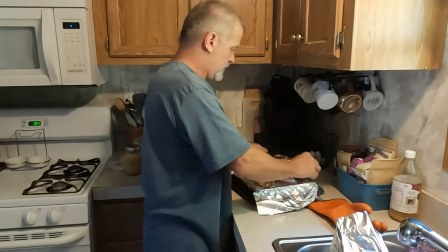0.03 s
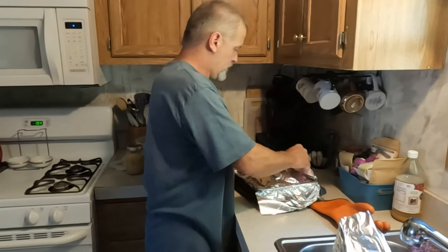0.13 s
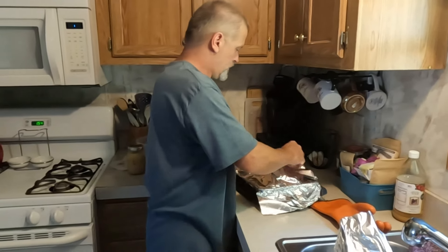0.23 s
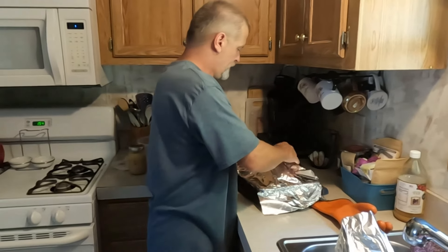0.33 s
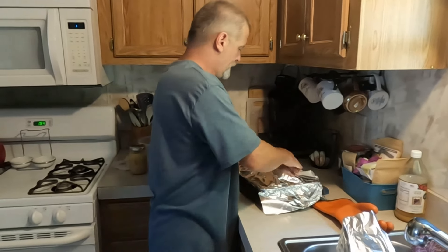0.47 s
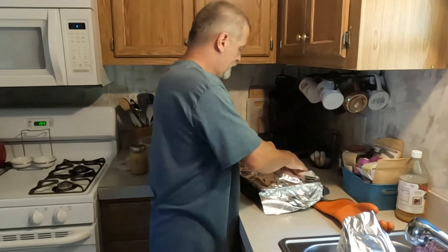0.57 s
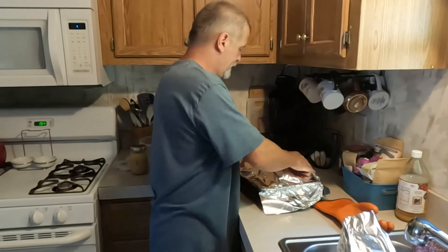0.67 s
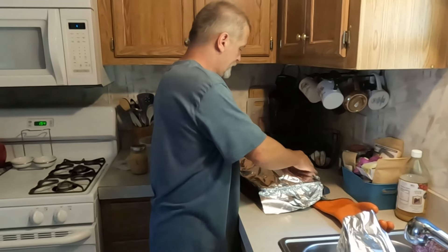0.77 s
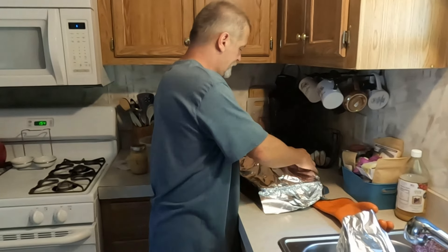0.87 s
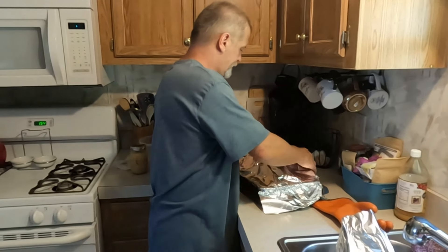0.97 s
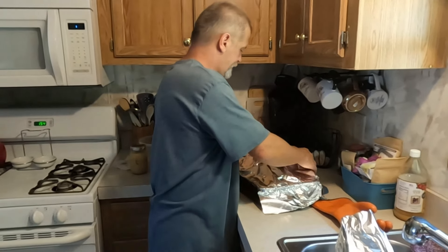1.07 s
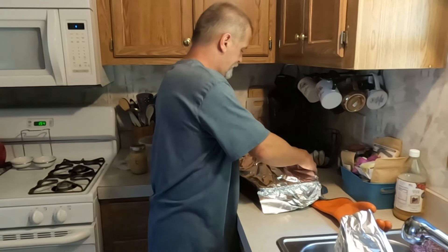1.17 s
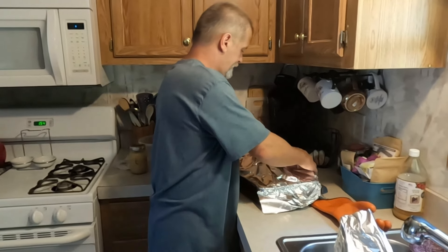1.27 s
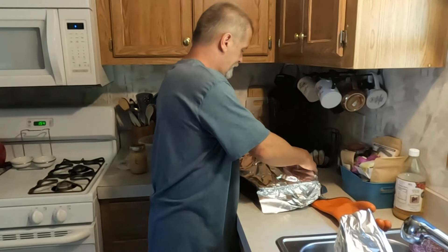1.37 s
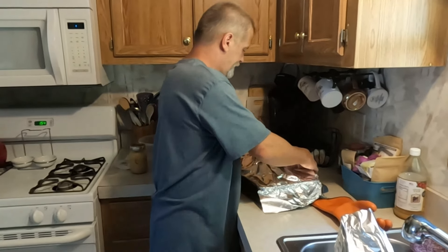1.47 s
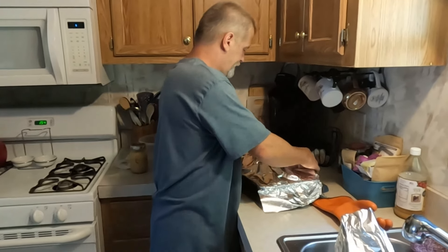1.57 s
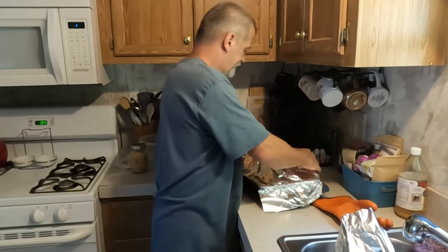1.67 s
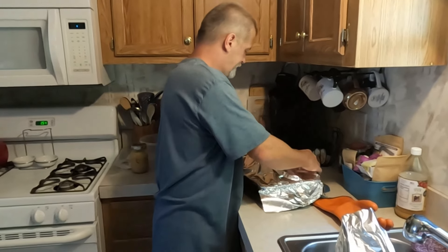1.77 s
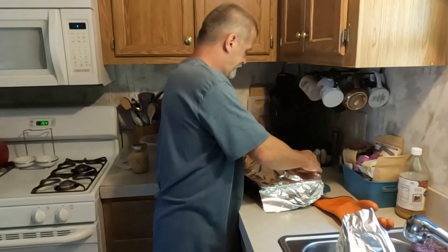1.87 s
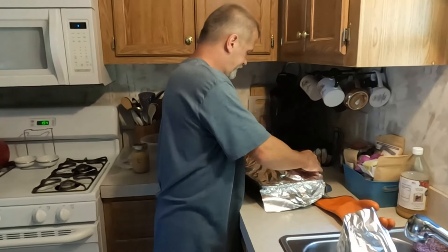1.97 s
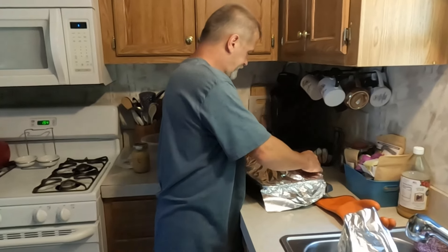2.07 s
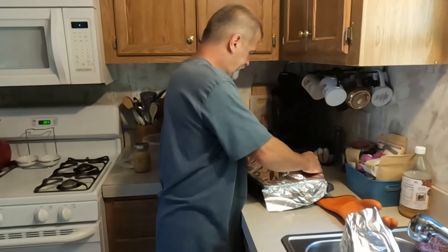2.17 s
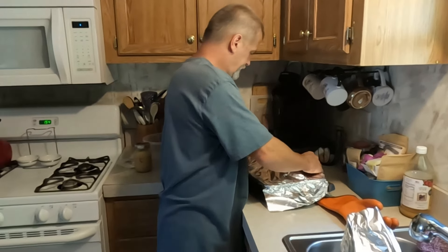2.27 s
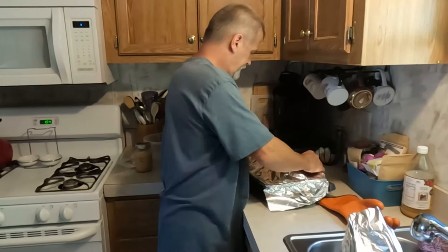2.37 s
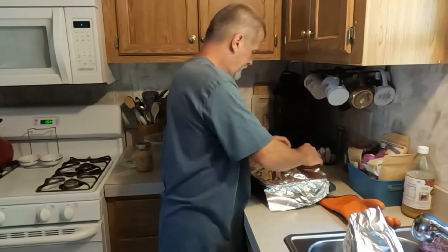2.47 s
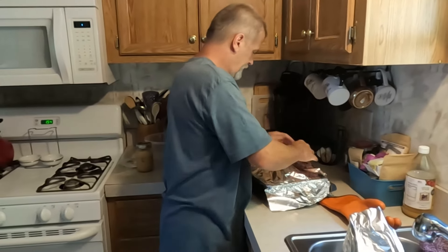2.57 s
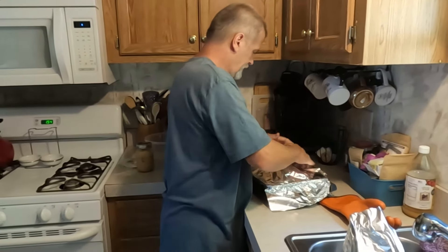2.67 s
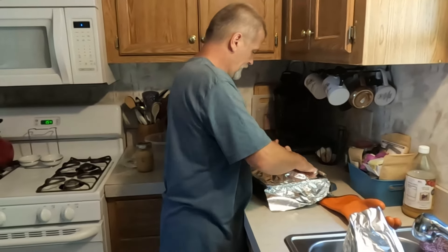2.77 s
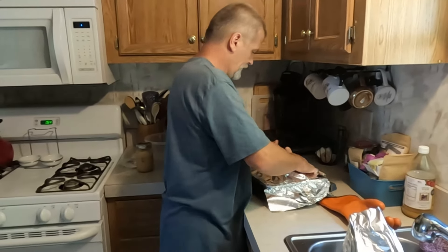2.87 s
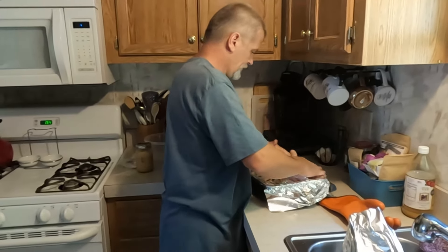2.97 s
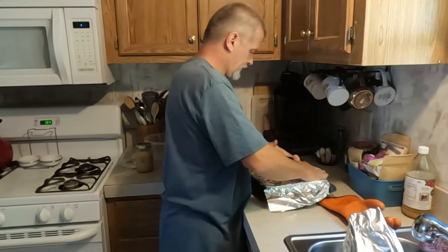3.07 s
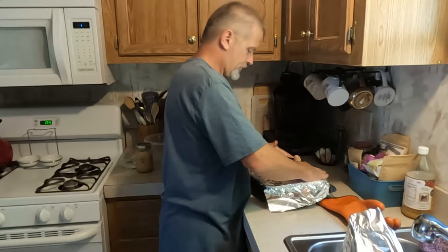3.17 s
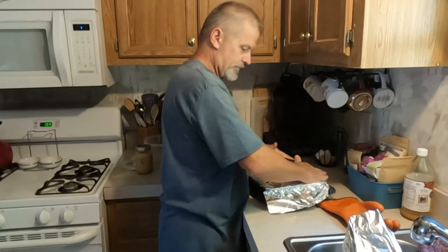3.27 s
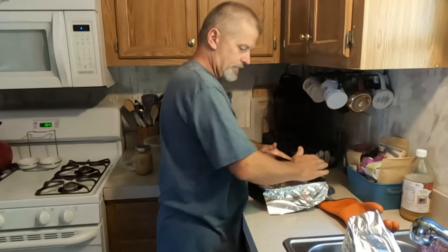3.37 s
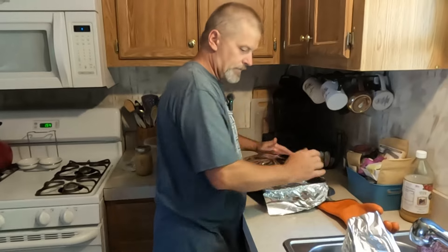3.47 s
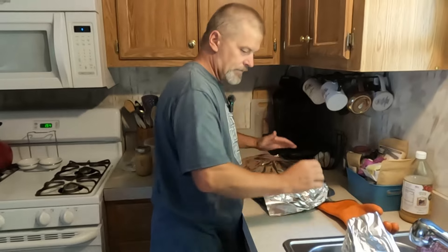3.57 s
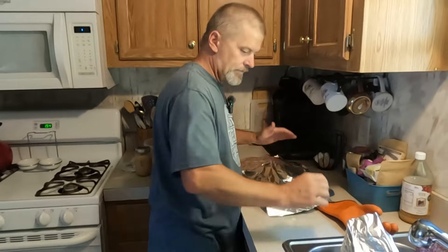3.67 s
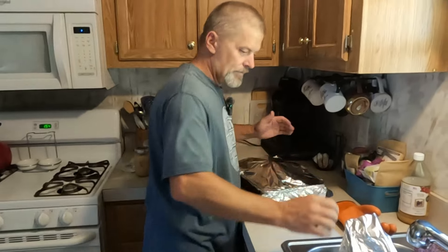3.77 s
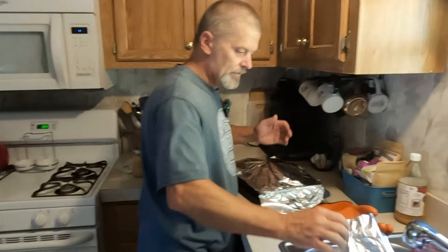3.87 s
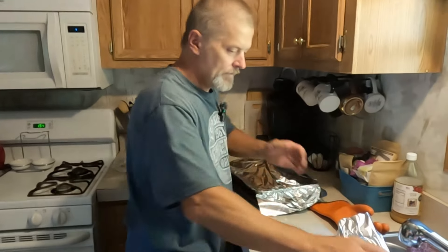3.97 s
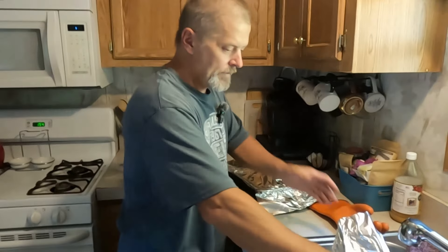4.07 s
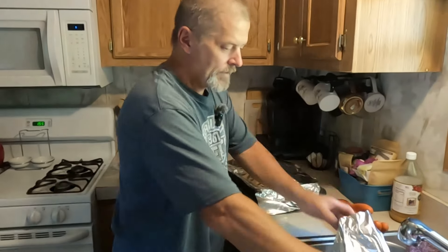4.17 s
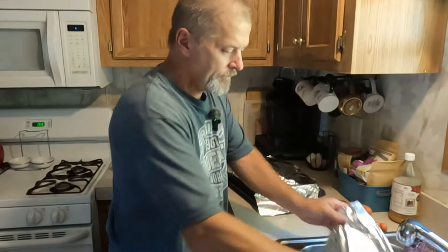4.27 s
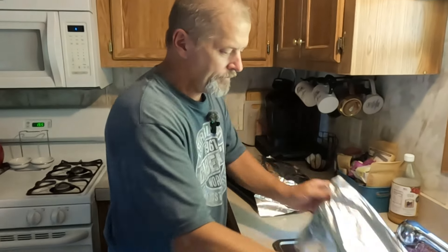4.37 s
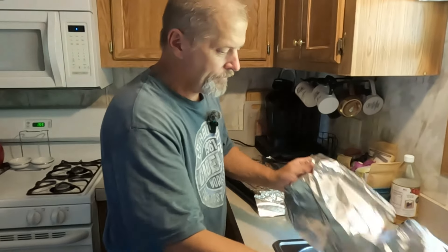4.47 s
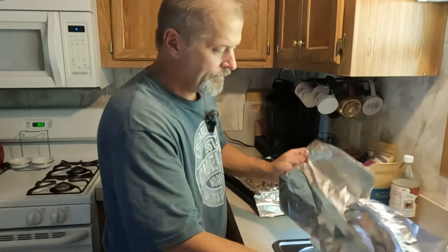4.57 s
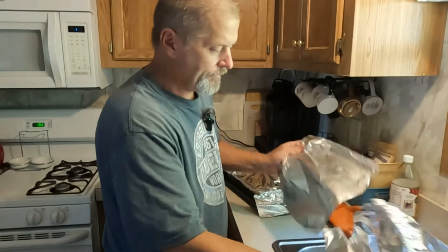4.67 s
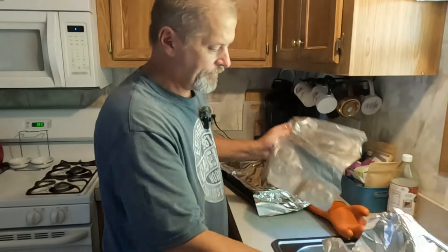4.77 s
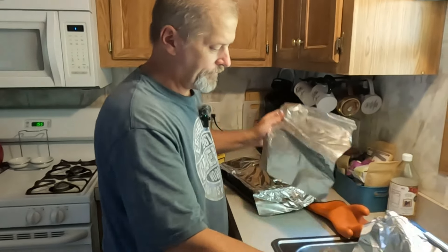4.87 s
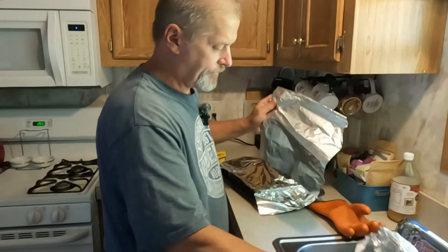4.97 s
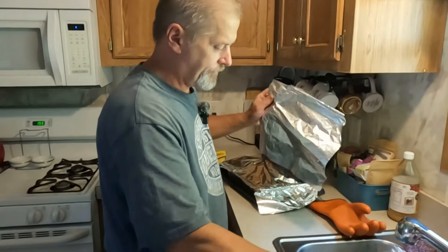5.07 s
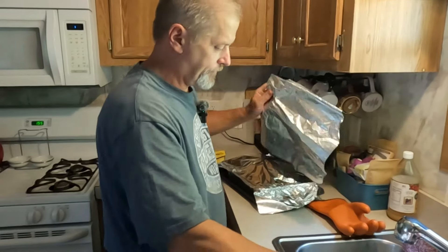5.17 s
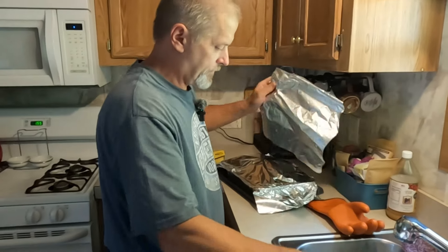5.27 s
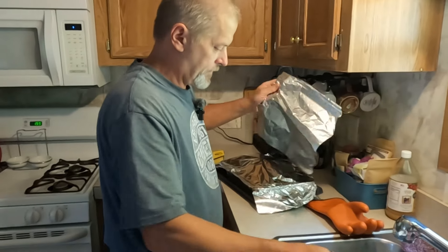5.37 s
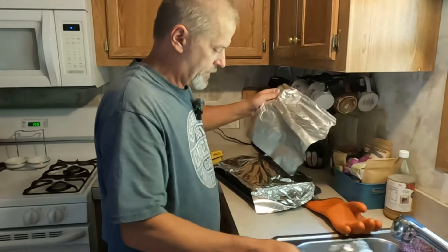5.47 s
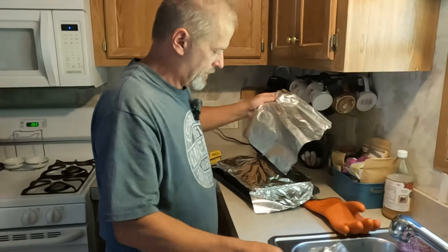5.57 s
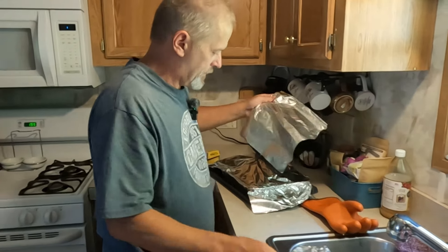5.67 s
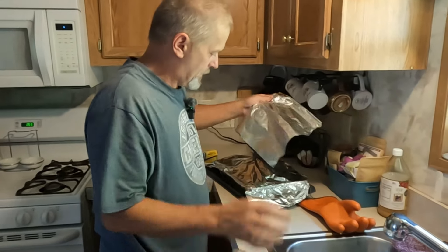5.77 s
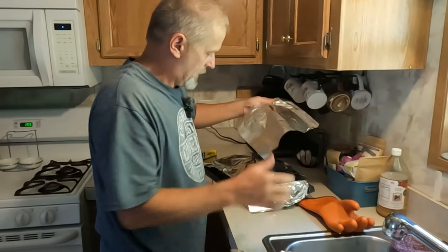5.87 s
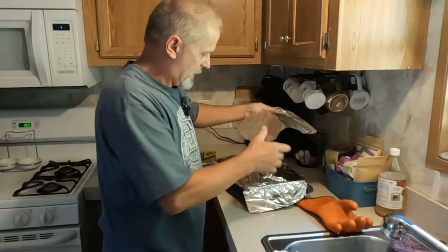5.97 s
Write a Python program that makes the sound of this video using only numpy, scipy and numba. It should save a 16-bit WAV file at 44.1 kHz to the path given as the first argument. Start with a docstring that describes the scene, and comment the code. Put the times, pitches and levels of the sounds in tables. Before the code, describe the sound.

Hands pinch and flatten crinkling foil over a pan in a quiet kitchen, pause, then lift another sheet with a loud rustle.

```python
"""Aluminium foil crackles as fingers crimp it round a pan, over a fridge hum in a small kitchen.
Creases buckle in swarms of tiny snaps, each ringing facets of the foil; folds give way, panels flip
and ring, sliding foil swishes and a fingertip squeaks. Palms press the foil flat and the pan rocks
on the counter. After a lull a second sheet is picked up, swung and held. The sound is mono."""
import sys
import numpy as np
from scipy import signal
from scipy.fft import rfft, irfft
from scipy.io import wavfile
from scipy.ndimage import uniform_filter1d
from numba import njit

SR = 44100
rng = np.random.default_rng(int(sys.argv[2]) if len(sys.argv) > 2 else 0)


def store_pcm(level_fs):
    """Save levels as 16-bit WAV."""
    pcm = np.round(np.clip(level_fs, -1, 1) * 32767).astype(np.int16)
    wavfile.write(sys.argv[1], SR, np.atleast_2d(pcm).T)


N = 264908
TIME = np.arange(N) / SR
TOP_HZ = 15800


def undb(db):
    """Decibels to gain."""
    return 10 ** (np.asarray(db) / 20)


def unit(x):
    """Scale to an rms of 1."""
    return x / np.sqrt(np.mean(x ** 2))


def fade(t, t60_s):
    """Exponential decay."""
    return np.exp(-np.log(1000) * t / t60_s)


def add(out, start_s, x):
    """Mix x into out."""
    i = max(int(start_s * SR), 0)
    out[i:i + len(x)] += x[:N - i]


def drift(rate_hz):
    """Smooth random drift, rms 1."""
    step = int(SR / rate_hz)
    stairs = np.repeat(rng.standard_normal(N // step + 1), step)
    return unit(uniform_filter1d(stairs, step)[:N])


def colour(x, points, peaks=(), size=2048):
    """Minimum-phase filter: (frequency [Hz], gain [dB]) points, a low cut and bell-shaped peaks."""
    f = np.maximum(np.arange(size // 2 + 1) * SR / size, 1)
    hz, db = np.transpose(points)
    curve_db = np.interp(np.log(f), np.log(hz), db) - 20 * np.log10(1 + (hz[0] / f / 2) ** 2)
    for centre_hz, width_hz, lift_db in peaks:
        curve_db += lift_db * np.exp(-2 * ((f - centre_hz) / width_hz) ** 2)
    cepstrum = irfft(np.log(undb(curve_db)))
    cepstrum[1:size // 2] *= 2
    cepstrum[size // 2 + 1:] = 0
    impulse = irfft(np.exp(rfft(cepstrum)))
    return signal.fftconvolve(x, impulse)[:len(x)]


def reflect(x, t60_s, wet_db, gap_s):
    """Direct sound plus a diffuse tail of reflections."""
    t = TIME[:int((t60_s + gap_s) * SR)]
    tail = rng.standard_normal(len(t)) * fade(t, t60_s) * (t > gap_s)
    return x + undb(wet_db) * signal.fftconvolve(x, tail / np.linalg.norm(tail))[:len(x)]


@njit
def facets(start_s, hz, t60_s, amplitude, length):
    """Each facet of the foil rings as a decaying sine."""
    out = np.zeros(length)
    for k in range(len(start_s)):
        pole = np.exp((2j * np.pi * hz[k] - np.log(1000) / t60_s[k]) / SR)
        phasor, first = amplitude[k] + 0j, int(start_s[k] * SR)
        for i in range(first, min(first + int(t60_s[k] * SR), length)):
            out[i] += phasor.imag
            phasor *= pole
    return out


def snaps(times_s, strengths, length, cycles=32, spread=0.86, facet_count=5):
    """Each buckling crease shakes a few facets of random size; large ones ring lower and longer."""
    hz = rng.uniform(98.6, TOP_HZ, len(times_s) * facet_count)
    t60_s = np.minimum(cycles / hz * np.exp(spread * rng.standard_normal(len(hz))), .04)
    amplitude = np.repeat(strengths, facet_count) * rng.choice([-1, 1], len(hz)) / np.sqrt(t60_s)
    return facets(np.repeat(times_s, facet_count), hz, t60_s, amplitude, length)


def swarm(snaps_per_s, scatter_db, bounce_db, places=14):
    """Snaps at many places on the foil, each place with its own bounces off pan, counter and cupboards."""
    out, each = np.zeros(N), int(snaps_per_s * N / SR / places)
    for _ in range(places):
        strengths = undb(scatter_db * np.minimum(rng.exponential(size=each), 3))
        direct = snaps(rng.uniform(0, N / SR, each), strengths, N)
        out += reflect(direct, t60_s=0.049, wet_db=bounce_db, gap_s=.001)
    return unit(out)


def shifting(x, depth_db, width_hz=450):
    """The foil keeps changing shape, so neighbouring bands swell and sink on their own."""
    f, _, frames = signal.stft(x, SR, nperseg=512)
    swell = uniform_filter1d(rng.standard_normal(frames.shape), size=9, axis=1)
    swell = uniform_filter1d(swell, max(int(width_hz / f[1]), 1), axis=0)
    return signal.istft(frames * undb(depth_db * unit(swell)), SR)[1][:len(x)]


# foil resonances and dips: (centre [Hz], width [Hz], gain [dB])
FOIL_RESONANCES = [(746, 290, -4), (1640, 240, 1.5), (2350, 600, -1), (3820, 410, 3), (5260, 280, 2),
                   (6470, 1000, 4.5), (7730, 570, -4.5), (8560, 810, 6.5), (9550, 650, -4),
                   (11260, 1500, -4), (13400, 1800, 5)]
# borders between broad flexing, stiff folds, ordinary crackle and fine creases: (frequency [Hz])
BAND_EDGES_HZ = (2350, 5100, 9650)


def crackle(levels_db, points, rings, snaps_per_s, scatter_db, rub_db, shift_db, bounce_db,
            flex_db, flex_growth, flex_reference_db=-35):
    """Snaps over sliding friction in four bands; the lowest, broad flexing, grows with the stiff folds."""
    flexing_db = flex_db + flex_growth * (levels_db[0] - flex_reference_db)
    source = swarm(snaps_per_s, scatter_db, bounce_db) + undb(rub_db) * rng.standard_normal(N)
    coloured = colour(shifting(source, shift_db), points, FOIL_RESONANCES + rings)
    spectrum = rfft(coloured, 2 ** 19)
    f = np.linspace(0, SR / 2, len(spectrum))
    lowpasses = [1 / (1 + (f / edge_hz) ** 20) for edge_hz in BAND_EDGES_HZ]
    masks = np.diff([np.zeros_like(f), *lowpasses, np.ones_like(f)], axis=0)
    bands = [unit(irfft(spectrum * mask)[:N]) for mask in masks]
    return sum(band * undb(db) for band, db in zip(bands, (flexing_db, *levels_db)))


def strokes(rows, fall_db_per_s, build_db=20):
    """Hand strokes build, hold and let go; gives stiff-fold, crackle and fine-crease levels in dB."""
    power = 1e-14
    for time_s, build_s, hold_s, db, stiff_db, fine_db in rows:
        rise_db = -build_db * np.maximum(time_s - TIME, 0) / build_s
        fall_db = -fall_db_per_s * np.maximum(TIME - time_s - hold_s, 0)
        envelope = undb(np.maximum(rise_db + fall_db, -120))
        power = power + np.outer(undb([db + stiff_db, db, db + fine_db]), envelope) ** 2
    return 10 * np.log10(power)


# pinches; the long weak row is the resting hand:
# (time [s], build [s], hold [s], level [dB], stiff folds [dB rel.], fine creases [dB rel.])
CRIMP_STROKES = [(0, 0.055, 2.3, -70, 5.5, -9), (.005, 0.053, 0.038, -43, -2.5, -9),
                 (.118, 0.032, 0.043, -26.5, -1.5, -8), (.19, 0.046, 0.038, -26, -1, -8),
                 (.385, 0.06, 0.053, -35.5, -3.5, -12), (.455, .018, .01, -29.5, -4, -5),
                 (.495, 0.068, 0.046, -35, 1, -6.5), (.645, 0.078, 0.036, -32, -2, -6),
                 (.722, 0.042, 0.028, -33, 1, -10), (.805, 0.046, .02, -46.5, 0, -9),
                 (.885, .08, 0.014, -46, 3.5, -14), (.93, .05, 0.097, -62, 3, -13),
                 (1.06, 0.1, 0.021, -37, 2.5, -10.5), (1.15, 0.039, 0.055, -48, 3.5, -2.5),
                 (1.335, 0.036, 0.0088, -50, 3.5, -8), (1.47, 0.022, 0.14, -56.5, 2.5, -10),
                 (1.672, 0.053, 0.044, -47.5, 3, -2), (1.72, 0.042, 0.054, -34.5, 1.5, -6.5),
                 (1.865, 0.086, 0.037, -48, 1, -5.5), (1.94, 0.053, 0.017, -30, -5.5, -7),
                 (1.98, 0.11, 0.0339, -26, 0.5, -7.5)]
# spectrum of pinched foil: (frequency [Hz], gain [dB])
CRIMP_SPECTRUM = [(150, -45.5), (250, -22.5), (570, -11.5), (850, -12), (1250, -10.5), (1720, -8),
                  (2100, -10.5), (2750, -10.5), (3500, -2), (5400, -3), (6800, -2), (8660, -3.5),
                  (10200, -6), (15900, -12)]
# rings of foil stretched over the pan: (centre [Hz], width [Hz], gain [dB])
STRETCHED_RINGS = [(560, 65, 4.5), (1210, 80, -1), (1420, 100, 3), (1550, 73, -1), (1720, 130, 1),
                   (2570, 85, 3.5), (2740, 200, -1.5)]


def crimp(body_hz=1740, body_width_hz=250, body_db=5.7):
    """Fingers pinch the foil round the rim; its hollow body resonates."""
    rings = STRETCHED_RINGS + [(body_hz, body_width_hz, body_db)]
    return crackle(strokes(CRIMP_STROKES, fall_db_per_s=419), CRIMP_SPECTRUM, rings,
                   snaps_per_s=1600, scatter_db=3.5, rub_db=-8.5, shift_db=2.0, bounce_db=-0.5,
                   flex_db=-43, flex_growth=0.61)


# fridge partials: (frequency [Hz], level [dB])
FRIDGE_PARTIALS = [(57.8, -64.5), (116.2, -55.5), (175, -63)]
# spectra of room rumble and air: (frequency [Hz], gain [dB])
RUMBLE_SPECTRUM = [(12, -48), (20, -4.5), (59, 2.5), (86, -5.5), (118, -3.5), (144, -9), (250, -17),
                   (320, -37), (550, -120)]
AIR_SPECTRUM = [(100, -13.5), (170, 0), (500, -1.5), (1000, -6), (2500, -13.5), (6000, -21.5),
                (15000, -27.5)]
# background dip: (time [s], gain [dB])
KITCHEN_GAIN = [(0, 0.5), (1.9, -0.5), (3.15, -0.5), (3.55, -3), (3.85, -7.5), (4.03, -15), (4.15, -9.5),
                (4.26, -12.5), (4.45, -3.5), (6.0, 0.5)]


def kitchen(hum_gain_db=.5, hum_wobble=0.00498, rumble_db=-51, air_db=-52):
    """Fridge hum, low rumble and soft air noise; all dip once while the hands are off the foil."""
    hum = np.zeros(N)
    for hz, db in FRIDGE_PARTIALS:
        level_db = db + hum_gain_db + 1.4 * drift(3.4)
        pitch_hz = hz * (1 + hum_wobble * drift(4.5))
        hum += undb(level_db) * unit(np.sin(2 * np.pi * np.cumsum(pitch_hz) / SR))
    rumble = unit(colour(rng.standard_normal(N), RUMBLE_SPECTRUM, size=8192))
    rumble *= undb(rumble_db + drift(4.7))
    air = unit(colour(rng.standard_normal(N), AIR_SPECTRUM)) * undb(air_db + 2.3 * drift(17))
    return (hum + rumble + air) * undb(np.interp(TIME, *np.transpose(KITCHEN_GAIN)))


# collapsing folds: (time [s], level [dB], focus [Hz])
FOLD_BURSTS = [(.0922, -24, 5200), (0.1021, -14.5, 8330), (.1154, -19, 3900), (.186, -9.5, 3600),
               (.4489, -12.5, 4510), (0.494, -17.5, 3820), (.7144, -24, 3770), (1.0524, -20.5, 3600),
               (1.4608, -37, 3870), (1.6643, -27, 3870), (1.711, -14, 4100), (1.994, -7, 4320),
               (2.0607, -14.5, 6470), (2.092, -9.5, 8900), (2.2292, -13, 6690), (2.2983, -21.5, 8720),
               (2.367, -22, 4160), (2.501, -33, 3800), (2.7251, -39, 3390), (2.9113, -21.5, 6600),
               (2.924, -26, 5470), (3.19, -21.5, 8810), (4.2922, -18, 6860), (4.3481, -22, 6840),
               (4.5645, -13, 6170), (4.6937, -12, 6700), (4.8021, -12, 8550), (5.903, -14.5, 3750)]


def folds(gain_db=-13, focus_db=6, focus_width_hz=1300, mean_delay_s=.01, followers=24, t60_s=0.074):
    """A fold gives way in an avalanche: one snap, then followers that thin out."""
    out = np.zeros(N)
    for time_s, db, hz in FOLD_BURSTS:
        delays_s = np.append(0, rng.exponential(mean_delay_s, followers))
        strengths = fade(delays_s, t60_s) * undb(0.81 * rng.standard_normal(followers + 1))
        burst = reflect(snaps(delays_s, strengths, SR // 5), t60_s, wet_db=0.5, gap_s=0.00075)
        burst = colour(burst, CRIMP_SPECTRUM, FOIL_RESONANCES + [(hz, focus_width_hz, focus_db)])
        onset_rms = np.std(burst[:SR // 100])
        add(out, time_s, burst / onset_rms * undb(db + gain_db))
    return out


# flat foil panels flipping over: (time [s], peak [dB], pitch [Hz], t60 [s])
PANEL_FLIPS = [(0.0922, -22, 5440, 0.015), (.141, -38, 1690, 0.051), (.452, -24, 3640, 0.057),
               (0.5, -24.5, 3460, 0.087), (1.053, -29.5, 1760, 0.083), (1.062, -38.5, 463, 0.2),
               (1.983, -9.5, 3550, .005), (2, -24, 1683, 0.082), (2.307, -31, 1463, 0.14),
               (2.315, -36.5, 766, 0.15), (2.934, -36, 1182, 0.15), (3.213, -32.5, 957, 0.11),
               (5.705, -40.5, 1600, 0.178), (5.823, -32, 1560, 0.095), (5.899, -23, 1552, 0.2)]


def panels(wobble=0.013, rise_s=0.00023):
    """A flipping panel rings with an unsteady pitch as its tension settles."""
    out, t = np.zeros(N), TIME[:SR // 5]
    waver = drift(250)
    for time_s, db, hz, t60_s in PANEL_FLIPS:
        pitch_hz = hz * (1 + wobble * np.roll(waver, -int(time_s * SR))[:len(t)])
        envelope = fade(t, t60_s) * (1 - np.exp(-t / rise_s))
        ring = np.sin(2 * np.pi * np.cumsum(pitch_hz) / SR) * envelope
        add(out, time_s, ring / np.abs(ring).max() * undb(db))
    return out


# swells of moving foil: (midpoint [s], length [s], centre [Hz], width [Hz], level [dB])
SWISH_SWELLS = [(.97, 0.28, 4270, 550, -45.5), (1.045, 0.11, 4150, 600, -37),
                (1.067, 0.116, 6230, 600, -36.5), (1.178, 0.11, 8500, 450, -42),
                (1.176, 0.092, 13500, 1200, -47), (1.886, 0.12, 2316, 150, -48.5),
                (2.133, 0.11, 1190, 200, -39), (2.142, 0.14, 2420, 450, -34.5), (4.378, .09, 645, 260, -27),
                (4.399, .22, 990, 130, -32.5), (4.752, .2, 790, 300, -26), (5.558, .25, 6370, 600, -47),
                (5.77, 0.11, 4060, 700, -44.5), (5.86, 0.16, 1380, 70, -40)]


def swishes(gain_db=-1):
    """Foil that slides under a finger or billows swells and fades in one narrow resonance."""
    out = np.zeros(N)
    for mid_s, length_s, hz, width_hz, db in SWISH_SWELLS:
        swell = np.hanning(int(length_s * SR))
        band = signal.butter(2, [hz - width_hz / 2, hz + width_hz / 2], "bandpass", fs=SR, output="sos")
        hiss = unit(signal.sosfilt(band, rng.standard_normal(len(swell))))
        add(out, mid_s - length_s / 2, hiss * swell * undb(db + gain_db))
    return out


def squeak(start_s=1.322, length_s=0.02, rise_s=0.0038, release_t60_s=0.09,
           pitch_hz=3210, wobble=0.012, level_db=-32.5, overtone_db=-27):
    """A fingertip sticks and slips on the foil for a moment."""
    t = TIME - start_s
    phase = 2 * np.pi * np.cumsum(pitch_hz * (1 + wobble * drift(410))) / SR
    tone = np.sin(phase) + undb(overtone_db) * np.sin(2 * phase)
    grip = np.clip(t / rise_s, 0, 1) * fade(np.maximum(t - length_s, 0), release_t60_s)
    return undb(level_db + 2 * drift(250)) * grip * tone


# palm strokes; the long weak row is the resting hand:
# (time [s], build [s], hold [s], level [dB], stiff folds [dB rel.], fine creases [dB rel.])
PRESS_STROKES = [(2.04, .05, 1.66, -69.5, 1.5, -9), (2.092, 0.078, 0.017, -24.5, -2, -6),
                 (2.125, .05, 0.042, -30, 0.5, -4), (2.19, 0.045, 0.057, -31, -0.5, -6),
                 (2.306, 0.025, 0.024, -32, 0, -6), (2.365, 0.037, 0.011, -42, 5, 0),
                 (2.516, 0.021, 0.044, -45.5, 5.5, -5), (2.6, 0.036, 0.011, -39.5, 0, -9),
                 (2.85, 0.042, 0.057, -60.5, 6, -4.5), (2.928, 0.028, 0.03, -31.5, 1, -14),
                 (2.98, .04, 0.0076, -47, 5.5, -8), (3.04, 0.039, 0.064, -55.5, 2.5, -6),
                 (3.196, 0.033, 0.042, -34.5, -2, -5.5), (3.28, .05, 0.062, -60.5, 4, -6),
                 (3.53, 0.029, 0.0105, -60, 0, -10.5), (3.613, 0.044, 0.023, -57.5, 4.5, -13)]
# spectrum of flattened foil: (frequency [Hz], gain [dB])
PRESS_SPECTRUM = [(150, -35), (380, -13.5), (600, -12.5), (800, -10), (1080, -6.5), (1720, -8.5),
                  (2100, -7), (2500, -6.5), (3800, -5), (5400, -3.5), (6800, -4), (8660, -7),
                  (10200, -12.5), (15900, -20)]


def press():
    """Palms press the foil flat over the pan, more and more lightly."""
    return crackle(strokes(PRESS_STROKES, fall_db_per_s=480), PRESS_SPECTRUM, STRETCHED_RINGS,
                   snaps_per_s=1600, scatter_db=3.5, rub_db=-6.5, shift_db=2.0, bounce_db=-1.5,
                   flex_db=-41, flex_growth=0.77)


# soft bumps on the counter: (time [s], peak [dB], contact [s])
PAN_BUMPS = [(2.7682, -35, 0.001), (2.7765, -35, .0002), (2.785, -28.5, 0.0019), (2.905, -33.5, 0.012)]
# pan modes: (frequency [Hz], level [dB], t60 [s])
PAN_BODY_MODES = [(303, 5, 0.046), (353, -1.5, .06), (623.6, 7, 0.033), (824, 3, .03), (1315, 5.5, 0.038)]


def pan(rise_s=0.0037):
    """The pan rocks on the counter; a longer contact gives a duller bump."""
    out, t = np.zeros(N), TIME[:SR // 5]
    ring = sum(undb(db) * np.sin(2 * np.pi * hz * t) * fade(t, t60_s) for hz, db, t60_s in PAN_BODY_MODES)
    ring *= 1 - np.exp(-t / rise_s)
    for time_s, db, contact_s in PAN_BUMPS:
        bump = signal.fftconvolve(ring, np.hanning(int(contact_s * SR) + 2))
        add(out, time_s, bump / np.abs(bump).max() * undb(db))
    return out


# crackle following the sheet's speed: (time [s], level [dB], stiff folds [dB rel.], fine creases [dB rel.])
SWING_CURVE = [(4.265, -84, 0, -9.5), (4.292, -29.5, -4.5, -16), (4.36, -16.5, -6.5, -10.5),
               (4.474, -22.5, -4.5, -10), (4.498, -31, -0.5, -8), (4.576, -24, -5, -7.5),
               (4.596, -28, -3, -10), (4.682, -22, -4, -13), (4.704, -14.5, -5.5, -14),
               (4.8, -18.5, -3.5, -6.5), (4.884, -23, -5.5, -7.5), (4.98, -41.5, -1, -12.5)]
# spectrum of the swung sheet: (frequency [Hz], gain [dB])
SWING_SPECTRUM = [(70, -11), (150, -11.5), (220, -8.5), (330, -10), (600, -3), (790, -2.5), (1000, -3.5),
                  (1750, 0.5), (2300, -4.5), (4660, -9.5), (6600, -2), (8600, -5.5), (11200, -16),
                  (15900, -21.5)]
# rings of the loose sheet: (centre [Hz], width [Hz], gain [dB])
LOOSE_RINGS = [(471.6, 107, 0), (657, 85, 4.5), (814, 44, 3), (1368, 63, 2.5), (2010, 170, 0.5),
               (2560, 150, -3)]


def swing(body_hz=790, body_width_hz=340, body_db=2.6):
    """The second sheet is lifted and swung, crackling in one continuous movement."""
    times_s, db, stiff_db, fine_db = np.transpose(SWING_CURVE)
    levels_db = [np.interp(TIME, times_s, db + rel_db, left=-140, right=-140)
                 for rel_db in (stiff_db, 0, fine_db)]
    rings = LOOSE_RINGS + [(body_hz, body_width_hz, body_db)]
    return crackle(levels_db, SWING_SPECTRUM, rings,
                   snaps_per_s=3000, scatter_db=3.0, rub_db=-6.5, shift_db=1.37, bounce_db=3.5,
                   flex_db=-37.5, flex_growth=1.176)


# sways and grips; the long weak row is the sheet trembling:
# (time [s], build [s], hold [s], level [dB], stiff folds [dB rel.], fine creases [dB rel.])
HOLD_STROKES = [(4.975, .05, 0.067, -37, -6.5, -21), (5.08, .05, .92, -56.5, -4, -15),
                (5.258, 0.032, .015, -57, -19, -1), (5.468, 0.03, 0.0253, -41.5, -8, -27),
                (5.55, .08, .1, -47.5, -6, -25.5), (5.73, 0.097, 0.142, -46.5, 1, -12),
                (5.835, 0.063, .03, -45.5, 4.5, -16), (5.905, 0.054, 0.019, -28.5, 5.5, -12),
                (5.965, .05, .02, -45, 8.5, -18)]
# spectrum of the hanging sheet: (frequency [Hz], gain [dB])
HOLD_SPECTRUM = [(240, -38.5), (700, -23), (1150, -12), (1550, -8), (1850, -11), (2320, -15.5), (3500, -11),
                 (5400, -17), (6500, -7), (7700, -12), (8600, -15.5), (15900, -28.5)]


def hold(body_hz=1900, body_width_hz=158, body_db=3.46):
    """The hanging sheet rustles as it sways and is gripped anew."""
    rings = LOOSE_RINGS + [(body_hz, body_width_hz, body_db)]
    return crackle(strokes(HOLD_STROKES, fall_db_per_s=290), HOLD_SPECTRUM, rings,
                   snaps_per_s=1400, scatter_db=5.0, rub_db=-0.5, shift_db=2.5, bounce_db=-1,
                   flex_db=-43, flex_growth=0.79)


def scene():
    """Foil and pan in the small kitchen, the same in both ears."""
    crackling = undb(-1) * crimp() + undb(-0.5) * press() + undb(-1.35) * swing() + undb(-1.5) * hold()
    direct = crackling + folds() + swishes() + panels() + squeak() + pan()
    mono = reflect(direct, t60_s=0.12, wet_db=-19.5, gap_s=0.00606) + kitchen()
    return np.array([mono, mono])


def record(dry, ceiling=.75):
    """The microphone rounds the highest peaks and cuts the top treble."""
    rounded = dry / (1 + (dry / ceiling) ** 4) ** .25
    lowpass = signal.ellip(10, .2, 75, TOP_HZ, fs=SR, output="sos")
    return signal.sosfilt(lowpass, rounded)


dry = scene()
out = record(dry)
store_pcm(out)
```